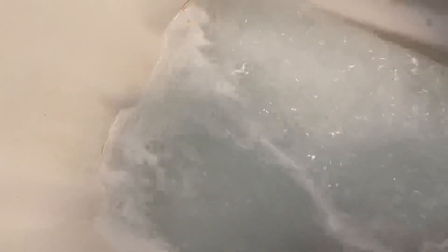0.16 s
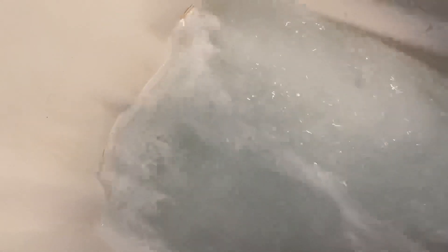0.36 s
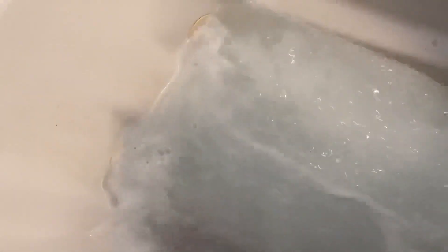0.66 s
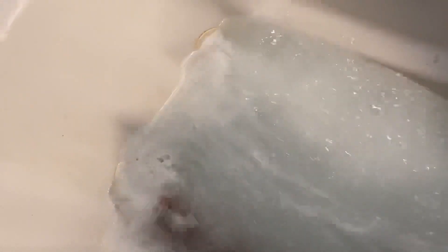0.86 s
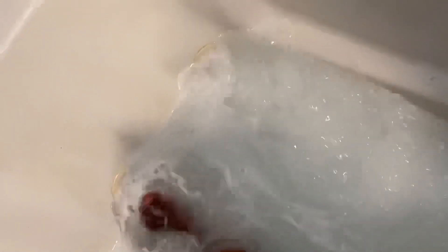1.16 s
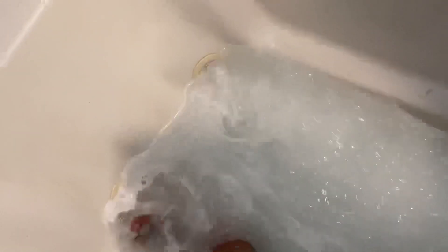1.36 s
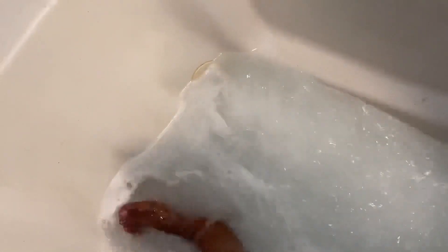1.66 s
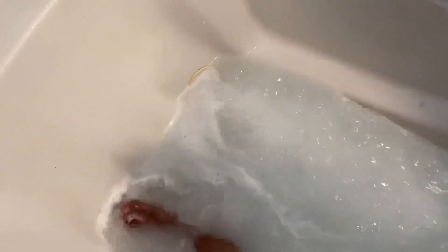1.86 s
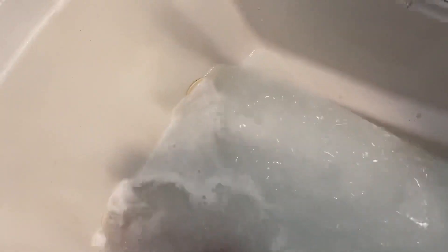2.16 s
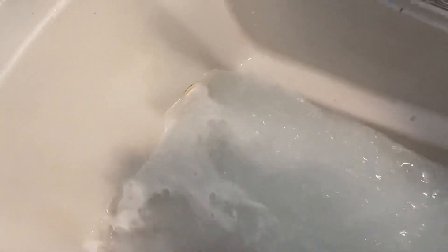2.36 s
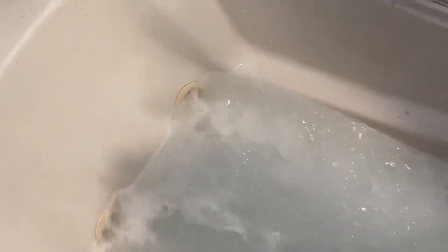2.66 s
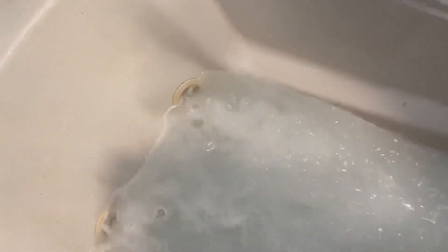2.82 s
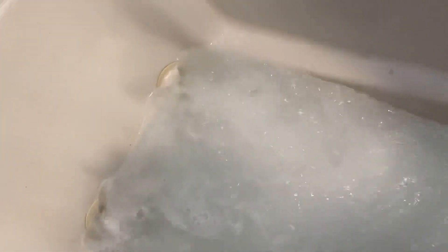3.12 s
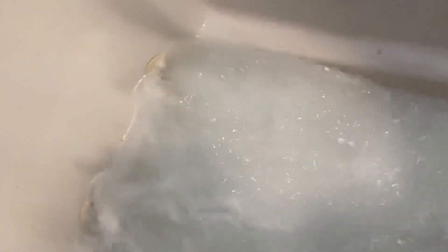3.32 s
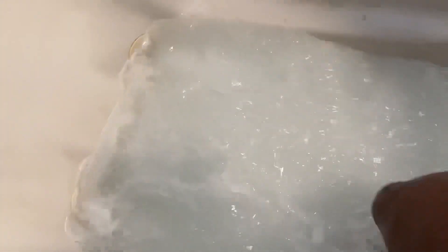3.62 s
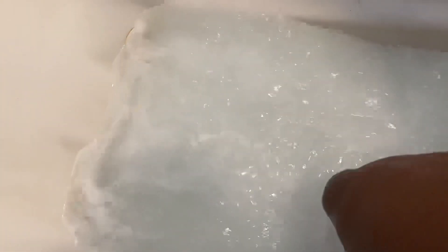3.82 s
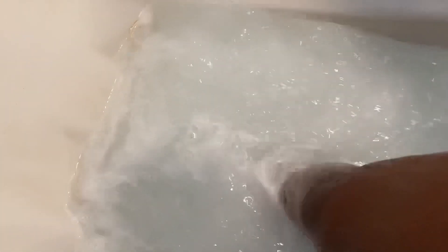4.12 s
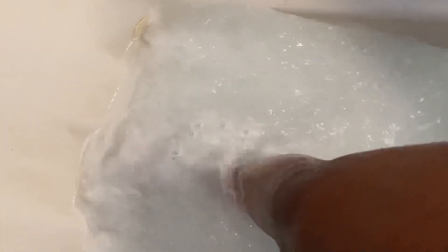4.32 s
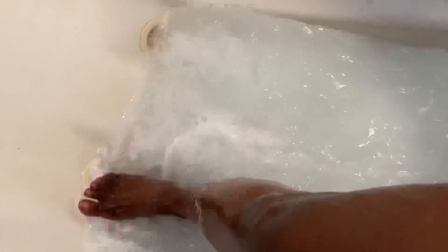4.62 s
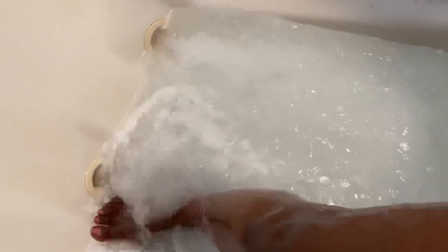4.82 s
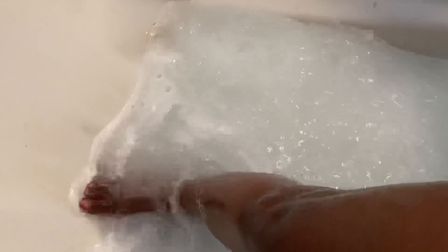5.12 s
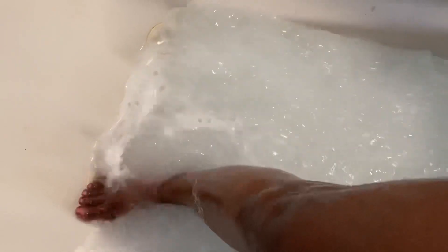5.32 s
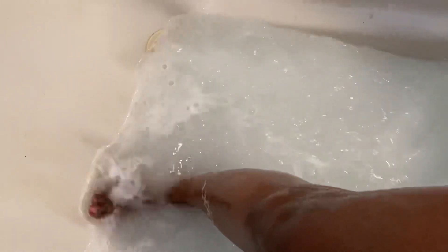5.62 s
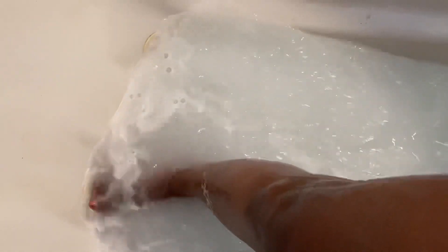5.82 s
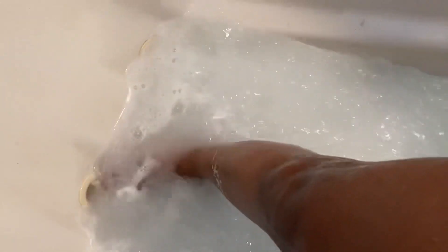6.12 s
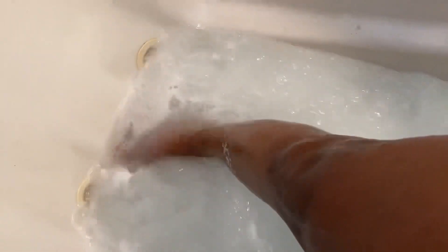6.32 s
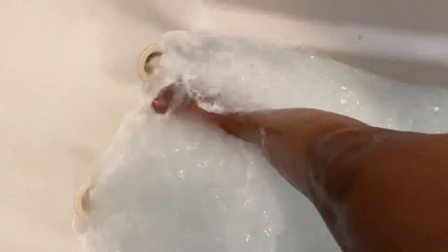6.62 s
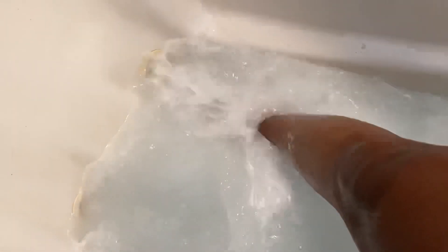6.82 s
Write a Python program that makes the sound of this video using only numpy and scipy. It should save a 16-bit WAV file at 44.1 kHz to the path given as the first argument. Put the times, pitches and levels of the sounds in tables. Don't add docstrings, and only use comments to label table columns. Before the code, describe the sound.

In a small tiled bathroom, a tub's jets rumble and throb continuously over a low motor hum. Bubbles gurgle and hiss softly on the surface. A foot stirs lightly, with scattered plops, then kicks up a brighter cluster of splashes and ringing drops, quietens, and splashes again at the end. Heard close on a handheld phone in stereo.

```python
import sys
import numpy as np
from scipy import signal
from scipy.fft import rfft, irfft, next_fast_len
from scipy.io import wavfile
from scipy.ndimage import uniform_filter1d, map_coordinates

SR = 44100
rng = np.random.default_rng(int(sys.argv[2]) if len(sys.argv) > 2 else 0)


def voltage_ratio(decibels):
    exponent = np.asarray(decibels, float) / 20
    return 10 ** exponent


def pcm_store(signal):
    levels = np.round(np.clip(np.atleast_2d(signal), -1, 1) * 32767)
    wavfile.write(sys.argv[1], SR, levels.astype(np.int16).T)


N = 307442

# centre in Hz, width in Hz, level in dB.
BOOM_MODES = [(54, 21, -5.5), (89.6, 5.1, -2), (105.5, 27.8, -11.5), (137.2, 7.1, -4), (162.9, 28, -9)]
# centre in Hz, width in Hz, level in dB.
SHELL_MODES = [(221, 47, -6.5), (268.3, 11.2, 3.5), (303.2, 8.6, 2.5), (321.6, 9.3, 4)]
# centre in Hz, width in Hz, level in dB.
RIM_MODES = [(334.4, 18.2, 0.5), (386.6, 23, -2.5), (410, 19, -6), (436, 19.7, -6.5)]
# centre in Hz, width in Hz, level in dB.
GURGLE_MODES = [(494.4, 17, 6.5), (546.6, 30, 4), (610.8, 20, 3.5), (672.4, 31, -1), (700, 33, 2.5)]
# peak in seconds, swell in dB.
HEAVES = [(0.372, 9), (0.814, 3), (1.049, 11), (1.394, 11.5), (1.611, 6.5), (1.709, 11), (1.976, 7.5),
          (2.287, 3), (2.638, 10.5), (2.831, -5), (3.072, 6.4), (3.767, 9), (3.957, 5), (4.161, 7.5),
          (4.358, 13), (4.643, 5), (4.8, 13), (4.957, 3), (5.059, 9), (5.448, 11), (5.638, 3), (6.003, 5),
          (6.193, 11.5), (6.432, 10), (6.604, 6), (6.903, 4)]

MAINS_HZ, VANE_HZ = 60, 288.6
# level in dB, left lead in rad, left-right difference in dB.
MOTOR_HUM = [
    (-24.5, 0.05, 3),
    (-38, -3.5, 6),
]
# time in seconds, level in dB.
VANE_LEVEL = [(0, -28), (.6, -41), (1.2, -44), (1.4, -35), (2, -39), (2.3, -28), (3.2, -36), (3.8, -29.5),
              (4.4, -28), (4.9, -27.5), (5.5, -22.5), (5.85, -29), (6.25, -33.5), (6.55, -23), (6.97, -27)]
# time in seconds, level in dB.
SIXTH_LEVEL = [(0, -30.5), (.6, -27.5), (1.2, -27.5), (1.5, -31), (2.1, -28.5), (3.1, -31), (3.4, -30.5),
               (4.5, -40), (4.8, -31), (5.3, -45), (5.6, -27.5), (5.85, -35), (6.3, -29), (6.97, -28)]

# frequency in Hz, level in dB.
SPLASH_SPECTRUM = [(400, -43), (650, 2), (800, 3.5), (1200, -0.5), (2200, -1), (2650, -2.5), (5000, -10),
                   (8000, -9.5), (16000, -50)]
# frequency in Hz, level in dB.
SPRAY_SPECTRUM = [(2000, -0.5), (4000, 6), (5500, 0), (6600, -1.5), (8300, -3), (10000, -1), (12300, -7),
                  (14000, -3), (15500, -10), (17000, -36)]
# centre in Hz, width in Hz, level in dB.
FROTH_MODES = [(1200, 41, 24), (1700, 22, -9), (2020, 510, -4), (2800, 54, 31)]
# peak in seconds, swell in dB, rise in seconds, fall in seconds.
STROKES = [(1.2, 1, 0.35, 0.47), (2.72, 3, 0.039, 0.081), (3.0, 4, 0.086, 0.25), (4.0, 0.5, 0.11, 0.43),
           (4.55, 0, 0.1, 0.14), (4.84, 4.5, 0.14, 0.1), (5.05, 4.5, 0.43, 0.15), (5.9, 0.5, 0.19, 0.25),
           (6.32, 1.5, 0.19, 0.084), (6.48, 4, 0.077, 0.13), (6.69, 4.5, 0.15, 0.17)]
# peak in seconds, swell in dB.
SLAPS = [(0.005, 9), (.56, 1.5), (.7, 2), (.99, 3), (1.28, 3), (1.44, 3), (1.78, 5), (2.79, 2.5),
         (2.91, 4.5), (3.07, 0), (3.16, 0), (4.5, 4.5), (4.74, 1), (4.81, 6), (4.87, -1.5), (4.93, 1.5),
         (5.17, 6.5), (5.34, 3.5), (6.31, 2.5), (6.43, 0), (6.6, 4.5), (6.68, 7), (6.71, 3), (6.77, 7.5),
         (6.95, 0.5)]

# start in seconds, peak in dB, pitch in Hz,
# left-right difference in dB.
DROPS_AND_POPS = [(0.07, -31, 1040, 1.0), (0.152, -31, 980, 1.5), (0.184, -30, 1320, 3), (0.322, -27, 822, 4),
                  (0.673, -19, 1000, 2.0), (0.75, -19, 1020, 1.5), (1.003, -21, 1240, 2.0), (1.106, -16, 3660, 2),
                  (1.259, -37, 1860, 0.5), (1.312, -16, 1220, -1), (1.428, -21, 1280, 3), (1.743, -30, 960, 2.0),
                  (2.043, -19, 1160, 1.5), (2.388, -34, 856, 1.5), (2.462, -25, 1850, 0.5), (2.622, -32, 1040, 1.0),
                  (2.702, -33, 880, 0.5), (2.74, -32, 1070, 0.5), (2.819, -30, 1420, 1.5), (2.866, -20, 820, 1.0),
                  (2.894, -19, 1760, 2.5), (3.07, -23, 2070, 0.0), (3.16, -32, 1290, 1.5), (3.382, -33, 1210, 2.0),
                  (3.94, -20, 1180, 1.5), (4.137, -24, 1940, -0.5), (4.495, -24, 2170, 1.0), (4.528, -15, 985, 1.0),
                  (4.721, -22, 1200, 1.5), (4.772, -20, 1210, 2.0), (4.808, -27, 1160, 1.0),
                  (4.923, -15, 1240, -0.5), (5.0, -19, 2150, 1.0), (5.025, -34, 1050, 1.0), (5.056, -28, 1720, 0.5),
                  (5.167, -17, 2430, 3), (5.212, -23, 1100, 1.0), (5.33, -32, 1150, -1), (5.586, -25, 977, 1.0),
                  (5.613, -20, 1070, 1.5), (6.251, -26, 829, 1.0), (6.314, -23, 890, 1.0), (6.35, -22, 940, 1.5),
                  (6.414, -20, 1060, 2.5), (6.547, -17, 815, 2.0), (6.595, -27, 1300, 1.0), (6.668, -18, 834, 2.5),
                  (6.771, -19, 802, 2.0),
                  (3.1, -19, 680, 9),
    (6.4, -21, 1700, 3),
    (1.1, -23, 3300, 0),
    (1.2, -33, 1600, 0),
    (6.75, -18, 1200, 0),
                  (4.4952, -23, 1950, 1.0), (4.5521, -26, 1940, 1.5), (4.5661, -25, 1870, 0.5),
        (4.5995, -23, 1900, 1.5), (4.613, -29, 1710, 0.0), (4.6314, -27, 2910, 0.5),
        (4.6549, -29, 2260, -0.5), (4.6688, -20, 2020, 0.0), (4.6988, -21, 1900, 0.0),
        (4.7257, -25, 2290, -1.5), (4.7831, -32, 1800, -1.0), (4.809, -16, 2060, 0.0),
        (4.837, -13, 1700, 1.0), (4.9233, -17, 2300, -0.5), (4.9986, -26, 2120, 0.5),
        (5.027, -32, 2200, 0.5), (5.056, -28, 1730, -0.5), (5.0919, -21, 1840, -0.5),
        (5.1358, -21, 1710, 1.0), (5.1667, -13, 2400, -1.0), (5.2121, -24, 1560, -0.5),
        (5.3303, -32, 2000, -0.5),
                  (6.2198, -21, 1690, 0.5), (6.2732, -23, 2000, 0.0), (6.2906, -21, 1590, 0.5),
             (6.3141, -31, 1350, 0.5), (6.412, -24, 1310, 3), (6.4518, -27.5, 2390, 0.0),
             (6.469, -29, 2350, 1.0), (6.5196, -18, 2020, 0.0), (6.556, -17, 2170, 3),
             (6.5879, -30, 1360, 1.0), (6.6513, -29, 2740, 3.0), (6.6638, -15, 2020, 4),
             (6.772, -23, 1780, 2.0), (6.93, -26, 1640, 1.5), (6.9476, -25, 1520, 2),
                  (1.0697, -22, 1420, -0.5), (1.2582, -38, 1690, 1.5), (1.2742, -28, 1880, 0.5),
            (1.4274, -34, 1420, 2.0), (1.6938, -26, 1470, 2.5), (1.7426, -29, 1860, 2.5),
            (2.2415, -38, 1610, 2.0), (2.3902, -38, 1520, -6), (2.4625, -28, 1850, 1.0),
            (2.6396, -30, 1430, 0.5), (2.7045, -29, 1860, 0.5), (2.7499, -28, 1700, -1.5),
            (2.7688, -27, 1510, 0.5), (2.8182, -34, 1420, 1.0), (2.8486, -31, 2320, 0.5),
            (2.884, -26, 1700, 1.0), (2.9115, -18, 1780, 0.5), (3.0018, -30, 1640, 0.0),
            (3.0502, -21, 1870, 2.0), (3.0696, -18, 2230, 1.5), (3.0891, -23, 2090, 0.5),
            (3.159, -30, 1700, 0.5), (3.179, -23, 1750, 0.5), (3.3071, -25, 1660, 1.5),
                  (4.6318, -31, 2900, -1.5), (4.6647, -27, 3740, -2), (4.7181, -30, 2840, -3.5),
             (4.7345, -25, 2410, -2.5), (4.7884, -31, 2880, -3.0), (4.8084, -28, 2780, -2.0),
             (4.9016, -36, 2490, -2.5), (4.9316, -27, 3500, -0.5), (4.9979, -26, 2700, -2.5),
             (5.0239, -30, 3440, -1.5), (5.0553, -26, 3490, -2.5), (5.0797, -23, 3050, -1.5),
             (5.1665, -28, 2410, -2.0), (5.2119, -30, 2420, -2.0),
                  (6.3359, -36, 2400, -2.5), (6.3548, -33, 2570, -2.0), (6.4306, -28, 3590, 0.0),
                  (6.4511, -28, 2630, 0.0), (6.496, -24, 2960, -2.0), (6.5559, -23, 3110, -1.0),
                  (6.6337, -29, 2850, 0.0), (6.6506, -25, 2750, -0.5), (6.6876, -25, 4220, -1.0),
                  (6.707, -27, 2860, -1.0), (6.7709, -31, 2730, 0.5), (6.7968, -26, 2810, -0.5),
                  (6.8542, -30, 2880, -0.5), (6.92, -33, 2640, -0.5)]
# start in seconds, peak in dB, pitch in Hz.
PLINKS = [(0.5811, -23, 5650), (0.6335, -28, 7160), (1.1653, -25, 6600), (1.2555, -28, 4690),
          (1.7719, -22, 7600), (1.8985, -22, 6350), (3.4052, -24, 6460), (4.57, -27, 5900),
          (4.6733, -17, 6560), (4.8045, -24, 4960), (4.8825, -17.5, 6400), (4.9067, -20, 6500),
          (4.9965, -15.5, 5760), (5.057, -18, 4540), (5.5917, -28, 4760), (6.4433, -32, 6290),
          (6.6089, -34, 5400), (6.6598, -26, 6160), (6.6877, -19, 4320), (6.773, -21, 5370)]
# start in seconds, peak in dB, pitch in Hz, T60 in seconds, left-right in dB.
TRAPPED = [(0.199, -21.5, 2840, .03, 0), (1.283, -21, 2320, .03, 0), (3.071, -19, 2320, .02, 2),
           (3.092, -20, 2090, .025, -1), (4.73, -20.5, 2290, 0.045, -2), (4.78, -22, 1200, .09, 1),
           (4.821, -18, 1700, 0.16, 9), (4.85, -14, 1700, 0.1, 5), (4.841, -18, 1177, 0.09, 8),
           (4.93, -21, 3420, 0.054, 4), (4.99, -21, 2200, 0.036, 2), (6.66, -26, 2850, 0.054, 0),
           (6.7, -27, 2800, 0.054, 0), (6.63, -24, 2870, 0.065, 5), (6.685, -31, 2990, .06, 0),
           (6.74, -21, 2820, 0.067, 2), (6.776, -23, 2720, .06, 0), (6.83, -29, 2890, .05, -3),
           (4.711, -24, 1200, 0.15, 8)]

# start in seconds, peak in dB, relative level of the lower part in dB.
TICKS = [(0.2119, -42, -4), (0.2738, -36.5, 8), (0.3315, -34, -15), (0.633, -32, 0), (0.7766, -42, -9),
         (1.1051, -34, -2), (1.1558, -38, 1), (1.256, -38, 10), (1.285, -34, -6), (1.3089, -38, 8),
         (1.7564, -39, -5), (1.7729, -22.5, -8), (1.938, -37, -10), (2.4633, -41, -2), (2.5404, -50, -7),
         (2.616, -45, -6), (2.7013, -45, -5), (2.8789, -39, -6), (3.0021, -37, 2), (3.3528, -37, -14),
         (4.2168, -35, -9), (4.6972, -35, -7), (4.775, -37, -3), (4.807, -31, 9), (4.8846, -38, 13),
         (4.9781, -34, 6), (4.9975, -35, 5), (5.0455, -32, -6), (5.0938, -37, -6), (5.1138, -32, -17),
         (5.3028, -32, -16), (5.5912, -36, -6), (6.086, -42, -7), (6.2173, -37, -5), (6.4213, -44, -3),
         (6.4433, -30.5, 5.5), (6.4687, -36, -3), (6.6273, -44, -5), (6.6433, -40, -7), (6.6972, -39, -4),
         (6.7316, -39, -6), (6.7875, -43, -6), (6.8653, -44, -7), (6.9242, -44, -6)]
# start in seconds, peak in dB.
CLOSE_TICKS = [
    (2.5411, -48),
    (4.217, -46),
]

# time in seconds, approach from 0 to 1.
APPROACH = [(0, 0.73), (.8, 0.28), (1.4, 0.25), (2.1, 0.02), (2.8, 0.4), (3.6, 0.62), (4.3, 0.72),
            (5.4, 0.9), (5.9, 1), (6.2, 0.9), (6.6, 0.98), (6.97, 0.89)]
# frequency in Hz, T60 in seconds.
TILES_T60 = [(500, 0.39), (3000, 0.25), (12000, 0.7)]
# frequency in Hz, share of power from 0 to 1.
COMMON_SHARE = [(170, 0.99), (340, 0.74), (640, 0.37), (1400, 0.31), (3100, 0.46), (5000, 0.88),
                (6600, 0.54), (8000, 1)]
# frequency in Hz, left lead in rad.
LEFT_LEAD = [(40, -0.86), (130, 0.85), (430, -0.19), (780, -1.56), (1980, 0.51), (3270, -0.18),
             (4050, -1.1), (5430, -1.17), (6500, -0.46)]
# frequency in Hz, left lead in rad.
PORT_SPACING = [(7300, 1.5), (8200, 2.3), (8500, 3.0), (9600, 3.3), (10200, 3.8), (11100, 5.4),
                (11700, 6.2), (13000, 6.4), (13300, 7.1), (14200, 8.4), (14600, 9.3), (16000, 9.5)]
# frequency in Hz, left-right difference in dB.
PORT_BALANCE = [(60, -1), (110, -6), (200, -0.5), (380, 3.5), (700, 0.5), (1290, 2), (2380, 0.0),
                (4400, -3), (8120, 2), (15000, 2)]


def jets():
    steep = lambda hz: hz ** 4 / (hz ** 4 + 52 ** 4)
    gulps = patchy(patch_db=1.83, size=8)

    boom = unit(filtered(gulps, lambda hz: modes(BOOM_MODES)(hz) * steep(hz) / (1 + (hz / 190) ** 12)))
    boom = steadied(boom, share=0.8, seconds=0.08)

    shell_band = lambda hz: hz ** 2 / (hz ** 2 + 200 ** 2) / (1 + (hz / 340) ** 8)
    rim_band = lambda hz: 1 / (1 + (325 / (hz + 1)) ** 8) / (1 + (hz / 465) ** 8)
    gurgle_band = lambda hz: 1 / (1 + (440 / (hz + 1)) ** 6) / (1 + (hz / 735) ** 16)
    shell = unit(filtered(gulps, lambda hz: modes(SHELL_MODES)(hz) * shell_band(hz)))
    rim = unit(filtered(gulps, lambda hz: modes(RIM_MODES)(hz) * rim_band(hz)))
    gurgle = unit(filtered(gulps, lambda hz: modes(GURGLE_MODES)(hz) * gurgle_band(hz)))
    shell, rim, gurgle = (steadied(part, share=0.97, seconds=0.17) for part in (shell, rim, gurgle))

    mix = voltage_ratio(heard(far_db=-22.5, change_db=0.5) + 0.53) * boom
    mix = mix + voltage_ratio(heard(far_db=-30, change_db=2.5) - 0.5) * shell
    mix = mix + voltage_ratio(heard(far_db=-29, change_db=-2) - 0.13) * rim
    return mix + voltage_ratio(heard(far_db=-40, change_db=8) + 1.4) * gurgle


def heave():
    rise_s, fall_s = 0.056, 0.035
    level_db = -31 + 1.25 * swell([(s, db, rise_s, fall_s) for s, db in HEAVES])
    return tone(56.1 + 3.94 * wobble(14), level_db + 1.5 * wobble(40), lead=.25, pan_db=-1.5)


def pump():
    hum = 0
    for k, (db, lead, pan_db) in enumerate(MOTOR_HUM):
        hum = hum + tone(2 * (k + 1) * MAINS_HZ, db - .3 + 2.4 * wobble(12), lead, pan_db)
    vane_db, sixth_db = curves(VANE_LEVEL)[0], curves(SIXTH_LEVEL)[0]
    sixth = tone(MAINS_HZ * 6 + 4 * wobble(20), sixth_db - 2 + 3 * wobble(14), lead=.4, pan_db=-1.5)
    eighth = tone(MAINS_HZ * 8, heard(far_db=-54.5, change_db=27.5) - 10, lead=.9, pan_db=-.2)
    vane_hz = VANE_HZ + 4.5 * wobble(30)
    vanes = tone(vane_hz, vane_db - 2.0 + 3.5 * wobble(18), lead=0.47, pan_db=0.5)
    octave = tone(2 * vane_hz, vane_db - 34, lead=2.4, pan_db=4.0)
    return hum + sixth + eighth + vanes + octave


def surface():
    calm_db = -37
    slap_rise_s, slap_fall_s = 0.0067, 0.021
    stroke_db = swell(STROKES)
    slap_db = swell([(s, db, slap_rise_s, slap_fall_s) for s, db in SLAPS])
    splash_db = calm_db + stroke_db + slap_db
    spray_db = calm_db - 14 + 1.44 * stroke_db + 0.15 * slap_db
    surge = wobble(13)

    burst = swarm(count=3000, size=500, centre_hz=2200, spread=0.543, cycles=10.0, size_db=3.0, most_db=6)
    burst = burst + voltage_ratio(8.0) * room(burst)
    rush = patchy(patch_db=1.8, size=5) + voltage_ratio(-9) * burst
    froth = voltage_ratio(-56 + 1.9 * (splash_db - calm_db)) * unit(filtered(burst, modes(FROTH_MODES)))

    wash = unit(filtered(rush, lambda hz: voltage_ratio(along(SPLASH_SPECTRUM, hz))))
    dull = filtered(wash, lambda hz: 1 / (1 + (hz / 1100) ** 4))
    splash = voltage_ratio(splash_db - 1.5 + 1.0 * surge) * (wash - dull)
    splash = splash + voltage_ratio(0.5 * (splash_db + 39.5) - 34.5) * dull

    grains = swarm(count=2500, size=120, centre_hz=7820, spread=0.327, cycles=5.3, size_db=0.5, most_db=25.0)
    fizz = patchy(patch_db=1.5, size=4) + voltage_ratio(-7.0) * grains
    spray = unit(filtered(fizz, lambda hz: voltage_ratio(along(SPRAY_SPECTRUM, hz))))
    spray = voltage_ratio(spray_db + 4.5 + 0.86 * surge) * spray

    blips = swarm(count=500, size=1000, centre_hz=2000, spread=.38, cycles=18, size_db=3.5, most_db=10)
    blips = voltage_ratio(-56 + 1.7 * stroke_db) * (blips + voltage_ratio(5.0) * room(blips))

    foam_s, foam_db, half_s, foam_hz, width_hz = 6.71, -45, .1, 2780, 220
    foam = unit(filtered(rush, lambda hz: modes([(foam_hz, width_hz, 0)])(hz) ** 2))
    foam = voltage_ratio(foam_db) * np.exp(-((np.arange(N) / SR - foam_s) / half_s) ** 2) * foam
    return foam + splash + froth + spray + blips


def drops():
    drop_t60_s, plink_t60_s, plink_pan_db = 0.039, 0.013, -5
    single = DROPS_AND_POPS
    rows = [(s, db, hz, drop_t60_s, pan_db) for s, db, hz, pan_db in single]
    rows = rows + [(*row, plink_t60_s, plink_pan_db) for row in PLINKS] + TRAPPED
    s, db, hz, t60, pan_db = np.transpose(rows)
    cycles = hz * t60 / np.log(1000)
    return np.array([bubbles(s, hz, cycles, voltage_ratio(db - 8.5 + side * pan_db), rise=0.0014, count=4000)
                     for side in (.5, -.5)])


def ticks():
    x, t = np.zeros((3, N + SR)), np.arange(3000) / SR
    crack = voltage_ratio(-60 * t / .008) * (1 - np.exp(-t / .0007))
    sputter = voltage_ratio(-19 - 60 * t / .15) * (1 - np.exp(-t / .006))
    for s, db, low_db in TICKS:
        start = round(s * SR)
        noise = rng.standard_normal((2, len(t)))
        x[:2, start:start + len(t)] += voltage_ratio([[db], [db + low_db]]) * (crack + sputter) * noise
    for s, db in CLOSE_TICKS:
        start = round(s * SR)
        x[2, start:start + len(t)] += voltage_ratio(db) * crack * rng.standard_normal(len(t))
    top = filtered(x[::2, :N], lambda hz: 1 / (1 + (8500 / (hz + 1)) ** 8) / (1 + (hz / 15300) ** 16))
    lower = filtered(x[1, :N], lambda hz: 1 / (1 + (5000 / (hz + 1)) ** 6) / (1 + (hz / 9000) ** 8))
    return voltage_ratio(12.5) * (top[0] + lower), voltage_ratio(21.0) * top[1]


def room(x):
    hz, t, z = signal.stft(rng.standard_normal((len(x), SR // 3)), SR, nperseg=256)
    decay = voltage_ratio(-60 * t / along(TILES_T60, hz)[:, None])
    tail = signal.istft(z * decay, SR, nperseg=256)[1]
    return signal.fftconvolve(x, tail / np.linalg.norm(tail[0]), axes=1)[:, :N]


def ports(trio):
    share_points = [(100, .998)] + COMMON_SHARE + [(8500, .998)]
    share = lambda hz: np.clip(along(share_points, hz), 0, 1)
    balance = lambda hz: voltage_ratio(along(PORT_BALANCE, hz) / 2 * [[1], [-1]])
    lead = lambda hz: np.exp(.5j * along(LEFT_LEAD + PORT_SPACING, hz) * [[1], [-1]])
    direct = filtered(trio[0], lambda hz: balance(hz) * np.sqrt(share(hz)) * lead(hz))
    return direct + filtered(trio[1:], lambda hz: balance(hz) * np.sqrt(1 - share(hz)))


def heard(far_db, change_db):
    return far_db + change_db * curves(APPROACH)[0]


def swell(events):
    t = np.arange(0, N, 32) / SR
    total = 0
    for s, db, rise, fall in events:
        total = total + db * np.exp(-np.where(t < s, (s - t) / rise, (t - s) / fall) ** 1.03)
    return np.interp(np.arange(N) / SR, t, total)


def steadied(x, share, seconds):
    power = np.abs(uniform_filter1d(np.mean(x ** 2, axis=0), max(round(seconds * SR), 1)))
    return unit(x / (power + 0.037) ** (np.clip(share, 0, 1) / 2))


def bubbles(s, hz, cycles, size, rise, count):
    t = np.arange(count) / SR
    life = (cycles / hz)[:, None]
    ring = np.sin(2 * np.pi * hz[:, None] * t * (1 + rise * t / life))
    ring = ring * np.exp(-t / life) * (1 - np.exp(-8 * t / life))
    ring = ring * np.linspace(1, 0, count)
    at = (s * SR).astype(int)[:, None] + np.arange(count)
    return np.bincount(at.ravel(), (size[:, None] * ring).ravel(), N + SR)[:N]


def swarm(count, size, centre_hz, spread, cycles, size_db, most_db):
    draw, pitch = rng.random((3, count, 2)), rng.standard_normal((3, count))
    hz = np.clip(centre_hz * np.exp(spread * pitch), 700, 15000)
    gain = voltage_ratio(np.minimum(-size_db * np.log(draw[..., 1] + 1e-9), most_db))
    start_s = draw[..., 0] * N / SR
    return unit(np.array([bubbles(start_s[k], hz[k], cycles, gain[k], rise=0.015, count=size)
                          for k in range(3)]))


def patchy(patch_db, size):
    z = signal.stft(rng.standard_normal((3, N)), nperseg=512)[2]
    field = uniform_filter1d(rng.standard_normal(z.shape[1:]), size=4, axis=0)
    field = uniform_filter1d(field, size=size, axis=1)
    return unit(signal.istft(z * voltage_ratio(patch_db * unit(field)), nperseg=512)[1][:, :N])


def tone(hz, db, lead, pan_db):
    phase = 2 * np.pi * np.cumsum(hz * np.ones(N)) / SR
    return np.sqrt(2) * np.array([voltage_ratio(db + side * pan_db) * np.sin(phase + side * lead) for side in (.5, -.5)])


def modes(table):
    def response(f):
        return sum((-1) ** k * voltage_ratio(db) * 1j * f * w / (c * c - f * f + 1j * f * w)
                   for k, (c, w, db) in enumerate(table))
    return response


def filtered(x, response):
    m = next_fast_len(N + 8192)
    return irfft(rfft(x, m) * response(np.fft.rfftfreq(m, 1 / SR)), m)[..., :N]


def wobble(rate):
    return map_coordinates(rng.standard_normal(int(N * rate / SR) + 4), [np.arange(N) * rate / SR])


def curves(rows):
    s, *cols = np.transpose(rows)
    return [np.interp(np.arange(N) / SR, s, c) for c in cols]


def along(points, hz):
    f, v = np.transpose(points)
    return np.interp(np.log(hz + 1), np.log(f + 1), v)


def unit(x):
    return x / np.sqrt(np.mean(x ** 2) + 1e-20)


def scene():
    near = drops()
    rim, close = ticks()
    water = ports(jets() + surface() + rim * [[1], [0], [0]])
    dry_drops = near + voltage_ratio(-5) * room(near)
    return pump() + heave() + water + dry_drops + close * voltage_ratio([[1.5], [-3]])


def top_cut(x):
    return signal.sosfilt(signal.butter(12, 15710, fs=SR, output="sos"), x)


def record(dry):
    top_hz = 15710
    mix = filtered(dry, lambda hz: hz < top_hz)
    return top_cut(mix)


dry = scene()
out = record(dry)
pcm_store(out)
```